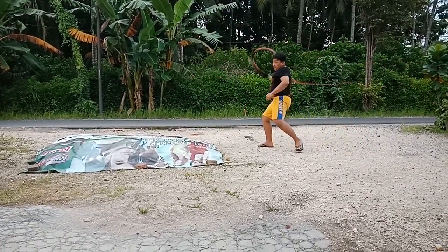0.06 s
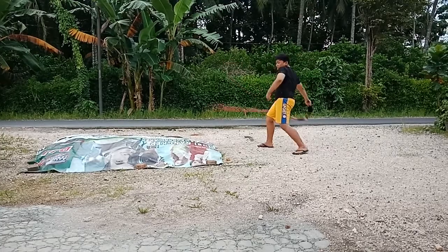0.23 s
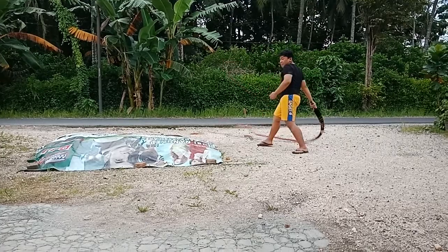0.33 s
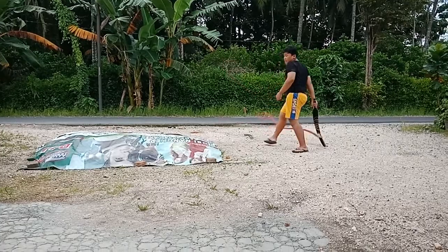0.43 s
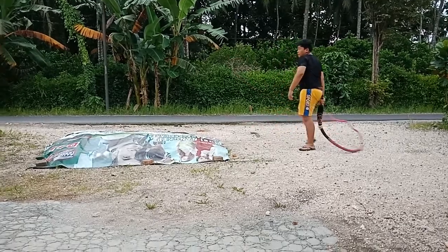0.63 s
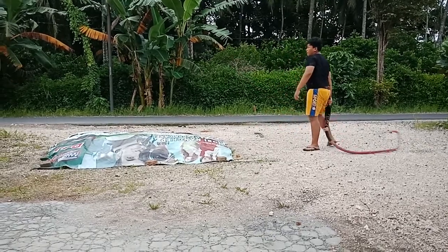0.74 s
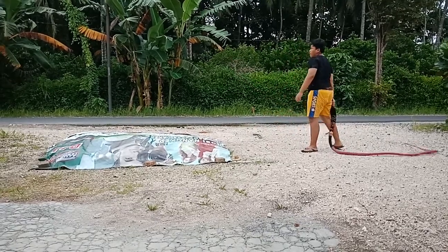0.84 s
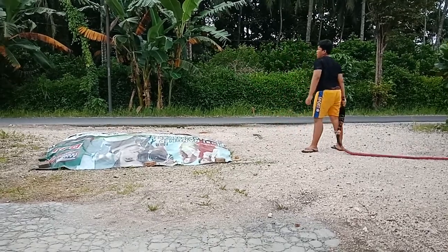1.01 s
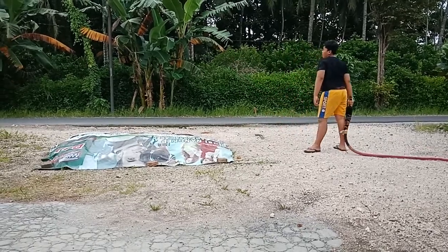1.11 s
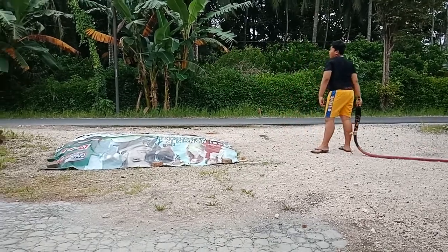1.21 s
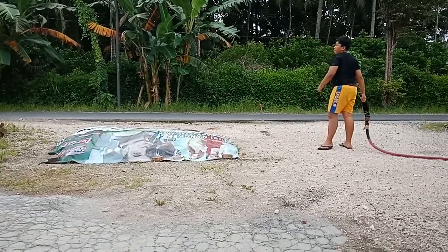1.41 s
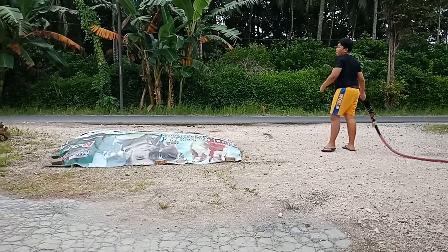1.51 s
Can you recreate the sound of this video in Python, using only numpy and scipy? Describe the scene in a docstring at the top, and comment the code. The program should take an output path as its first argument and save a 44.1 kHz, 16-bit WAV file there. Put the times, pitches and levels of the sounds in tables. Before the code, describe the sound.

Quiet roadside air with a gravel scuff and low distant motorbike, then one sharp, overloaded whip crack with a short thump and hissing echo tail; faint footsteps follow, on a stereo phone microphone that ducks and recovers.

```python
"""Sandals scuff gravel while a motorbike putters far off; then a long whip swishes and cracks, close by.
Footsteps, swish, echoes and air are shaped noise; the motorbike is a smeared train of firing pulses.
The crack is N-shaped shocks with noisy scatter, over a thump of damped sines; ground and trees
return it as a long hiss. A faint sine comes and goes afterwards.
The microphones saturate, and the phone's gain ducks and recovers."""
import sys
import numpy as np
from scipy import signal
from scipy.fft import rfft, irfft
from scipy.io import wavfile

SR = 44100
rng = np.random.default_rng(int(sys.argv[2]) if len(sys.argv) > 2 else 0)


def to_wav(s):
    """Save 16-bit WAV."""
    ch = np.atleast_2d(s).T  # columns
    pcm = np.round(np.clip(ch, -1, 1) * 32767)  # PCM
    wavfile.write(sys.argv[1], SR, pcm.astype(np.int16))


N = 68355  # length in samples, about 1.55 s

# Scuffs on gravel: start t/s, rise t/s, hold t/s, t60 t/s, level/dB, tilt/(dB per octave)
SCUFFS = [(0, 0.017, 0.0073, 0.59, -44, -1.5), (0.818, 0.0051, 0.023, 0.21, -43.5, -2),
          (1.242, 0.0088, 0.02, 0.38, -49, -4.5), (1.292, 0.02, 0.021, 0.3, -54, 0),
          (1.36, 0.012, .035, 0.2, -49.5, -2), (1.452, .02, 0.017, .4, -57, 3)]
# Spectrum of grinding stones, relative: f/Hz, level/dB
GRAVEL_SPECTRUM = [(300, -5.5), (800, 2.5), (1700, 8), (3500, 4.5), (4700, -3.5), (6500, -23), (8500, -39),
                   (15000, -45)]
# Left-right balance of swish, scuffs and echoes at the two microphones: f/Hz, left minus right level/dB
PORTS_PAN = [(100, 1.5), (700, -1), (1280, 0), (2350, -4), (4340, -10.5), (7000, -20), (15000, -21)]
# Spectrum of the distant exhaust, relative: f/Hz, level/dB
EXHAUST_SPECTRUM = [(25, -35), (55, -23), (80, -4), (112, 2), (150, -5), (190, -3.5), (270, -10),
                    (400, -11), (550, -14), (900, -26), (2000, -52)]
# Rise and fall of the motorbike around its base level: t/s, level/dB
BIKE_LEVEL = [(0, 4.5), (.15, 6), (.5, -1.5), (.85, -3), (1.1, -4), (1.22, 5.5), (1.35, -0.5), (1.55, 4.5)]
# Spectrum of the open-air background, relative: f/Hz, level/dB
AIR_SPECTRUM = [(25, -38), (50, -26.5), (75, 2.5), (130, -1.5), (250, -5.5), (400, -12), (650, -10.5),
                (1000, -14), (1800, -14.5), (4200, -21.5), (5500, -30), (8000, -45), (15000, -43)]
# Left-right balance of the background: f/Hz, left minus right level/dB
AIR_PAN = [(100, -1), (400, -9.5), (1280, 1.5), (2350, -3), (4340, -12.5), (8000, -4), (15000, 2.5)]
# Swish of the lash: start t/s, rise t/s, hold t/s, t60 t/s, level/dB
SWISH = (.177, .018, .006, .12, -37)
# The crack, its ground bounce, then a crackle: start t/s, level/dB, scatter t60 t/s, tilt/(dB per octave)
SHOCKS = [(.216, 9.5, 0.09, -1.06), (.23, 3.5, 0.08, 3.5), (0.2348, 4.5, 0.086, 1.5)]
# Spectrum of the crack, relative: f/Hz, level/dB
CRACK_SPECTRUM = [(60, -34.5), (120, -4.5), (250, -7.5), (750, -2), (1050, -4), (1500, 2.5), (2200, -0.5),
                  (2900, 0), (4000, -5.5), (6000, -20.5), (8000, -35), (15000, -60)]
# Left-right balance of the crack: f/Hz, left minus right level/dB
CRACK_PAN = [(200, -4), (380, -1), (690, 4), (1280, 5), (2350, -2), (4340, -5.5), (8000, -10), (15000, 1)]
# Low swings the blast knocks out of the microphones: f/Hz, level/dB before panning, t60 t/s
THUMP = [(95, -1, 0.1), (133.8, -9.5, .1), (205, -1, 0.065), (358, -9.5, 0.082)]
# Returns from the nearby ground and the trees: start t/s, rise t/s, hold t/s, t60 t/s, level/dB
ECHOES = [(0.222, 0.0059, 0.011, 0.38, -1.5), (0.318, 0.07, 0.078, 0.83, -20.5)]
# Spectrum of the returning hiss, also used for the swish, relative: f/Hz, level/dB
ECHO_SPECTRUM = [(70, -44.5), (170, -21), (380, -8), (630, -5.5), (1000, -2.5), (1700, 2), (2600, 1.5),
                 (3900, -8.5), (5700, -17), (6800, -31.5), (8200, -45.5), (15000, -55.5)]

GRIT_DB = 2.6  # mean random boost of each grain
FIRING_HZ, BIKE_JITTER = 37.5, .02  # mean firing rate; spread of the gaps as a fraction of one period
BIKE_DB, BIKE_SCATTER_DB, BIKE_PATHS_T60_S = -49.5, 3.5, 0.56
AIR_DB = -50
PORTS_ALIKE_HZ = 520  # well below this both microphones hear nearly the same
SHOCK_S, SHOCK_DB = .0005, -2.5  # length of the N-shaped wave; its height over the scatter
THUMP_PAN_DB, THUMP_LAG_S = -8.5, 0.0023  # left minus right; delay of the left
TREBLE_LOSS_DB_PER_S_KHZ, ECHO_MIDDLE_S = 2.5, 0.27
ECHO_GRAIN_DB, ECHO_GRAINS_PER_S = 1.1, 400
WHINE_HZ = 531
OVERLOAD_DB, LOW_CUT_HZ = 9.5, 62
CEILING_DB, RECOVER_DB_PER_S, LIMITER_ATTACK_S = -4.5, 30, .004
RUMBLE_HZ, RUMBLE_TRIP_DB, RUMBLE_CUT_DB = 170, -13, -8
RUMBLE_HOLD_S, RUMBLE_SLEW_S = 0.16, .06
CLIP_KNEE = 6  # higher is harder
TOP_HZ = 15400


def undb(db):
    """Turn decibels into an amplitude factor."""
    return 10 ** (np.asarray(db) / 20)


def curve(points):
    """Spread a (f/Hz, level/dB) table over every frequency bin, along log frequency."""
    hz, db = np.array(points, float).T
    bins_hz = np.fft.rfftfreq(N, 1 / SR)
    return np.interp(np.log(bins_hz + 1), np.log(hz), db)


def tilt(points, db_per_octave):
    """Lean a spectrum about 2 kHz."""
    return [(hz, db + db_per_octave * np.log2(hz / 2000)) for hz, db in points]


def colour(x, points):
    """Multiply a sound's spectrum by a curve and bring it to rms 1."""
    y = irfft(rfft(x) * undb(curve(points)), N)
    return y / y.std()


def ring(x, points):
    """Filter causally, with minimum phase and unit energy, so nothing sounds ahead of the hit."""
    cepstrum = irfft(curve(points) * np.log(10) / 20, N)
    # folding the cepstrum onto positive time gives minimum phase
    cepstrum[1:N // 2] *= 2
    cepstrum[N // 2:] = 0
    response = irfft(np.exp(rfft(cepstrum)), N)
    response = response / np.sqrt(np.sum(response ** 2))
    return signal.fftconvolve(x, response)[:N]


def place(x, pan):
    """Tilt a stereo pair left or right, frequency by frequency."""
    gains = undb(np.outer([.5, -.5], curve(pan)))
    return irfft(rfft(x) * gains, N)


def diffuse(points):
    """Noise from all around: nearly alike at both microphones in the bass, unrelated well above."""
    alike = .93 / (1 + (np.fft.rfftfreq(N, 1 / SR) / PORTS_ALIKE_HZ) ** 4)
    mid, side = rfft(rng.standard_normal((2, N)))
    shared = mid * np.sqrt(1 + alike)
    opposed = np.outer([1, -1], side * np.sqrt(1 - alike))
    return colour(irfft(shared + opposed, N), points)


def fade(age, t60):
    """Instant attack, then an exponential release of 60 dB per t60."""
    return (age >= 0) * np.exp(-np.log(1000) * np.maximum(age, 0) / t60)


def swell(t, start, rise, hold, t60, db):
    """Linear rise, hold and exponential release."""
    attack = np.clip((t - start) / rise, 0, 1)
    release = fade(np.maximum(t - start - rise - hold, 0), t60)
    return undb(db) * attack * release


def footsteps(t):
    """Sandals grind small stones: uneven noise grains, each scuff with its own brightness."""
    grains = rng.standard_normal((2, N)) * undb(GRIT_DB * rng.exponential(size=N))
    steps = 0
    for *shape, lean in SCUFFS:
        steps = steps + colour(grains, tilt(GRAVEL_SPECTRUM, lean)) * swell(t, *shape)
    return place(steps, PORTS_PAN)


def motorbike(t):
    """Slightly uneven firings of a distant single cylinder, smeared by many paths into a low note."""
    chance = rng.standard_normal((80, 2))
    at = (np.cumsum(1 + BIKE_JITTER * chance[:, 0]) - 1) * SR / FIRING_HZ
    inside = (at >= 0) & (at < N)
    pulses = np.zeros(N)
    pulses[at[inside].astype(int)] = undb(BIKE_SCATTER_DB * chance[inside, 1])
    # the paths smear phase only; the exhaust curve sets the colour
    paths = rfft(rng.standard_normal(N) * fade(t, BIKE_PATHS_T60_S))
    smeared = irfft(rfft(pulses) * paths / np.abs(paths), N)
    level_db = BIKE_DB + np.interp(t, *np.array(BIKE_LEVEL).T)
    return undb(level_db) * colour(smeared, EXHAUST_SPECTRUM)


def background_air():
    """A steady bed of diffuse noise from the open air."""
    return undb(AIR_DB) * place(diffuse(AIR_SPECTRUM), AIR_PAN)


def swish(t):
    """The lash tears the air: a short swell of diffuse noise that starts just before the crack."""
    return place(diffuse(ECHO_SPECTRUM), PORTS_PAN) * swell(t, *SWISH)


def crack(t):
    """N-shaped shocks, each with dense scatter behind it; the ground bounce and the later crackle are brighter."""
    snap = 0
    for start, db, t60, lean in SHOCKS:
        age = t - start
        n_wave = (age >= 0) * (age < SHOCK_S) * (1 - 2 * age / SHOCK_S)
        scatter = fade(age, t60) * rng.standard_normal((2, N))
        push = undb(db) * (undb(SHOCK_DB) * n_wave + scatter)
        spectrum = tilt(CRACK_SPECTRUM, lean)
        snap = snap + np.array([ring(side, spectrum) for side in push])
    return place(snap, CRACK_PAN)


def thump(t):
    """The blast jolts the microphones into low, quickly damped swings, the right one first and harder."""
    lag = np.array([[THUMP_LAG_S], [0]])
    age = t - SHOCKS[0][0] - lag
    swings = sum(undb(db) * np.sin(2 * np.pi * hz * age) * fade(age, t60) for hz, db, t60 in THUMP)
    return swings * undb(THUMP_PAN_DB * np.array([[.5], [-.5]]))


def echoes(t):
    """Countless stones and leaves return the crack as grainy hiss, duller as the paths get longer."""
    hz, when, bins = signal.stft(diffuse(ECHO_SPECTRUM), SR, nperseg=512)
    # the balance pivots at 2 kHz: brighter ahead of the middle time, duller after it
    loss_db = TREBLE_LOSS_DB_PER_S_KHZ * np.outer(hz / 1000 - 2, when - ECHO_MIDDLE_S)
    wash = signal.istft(bins * undb(-loss_db), SR)[1][:, :N]
    knots = np.arange(0, t[-1], 1 / ECHO_GRAINS_PER_S)
    grain = undb(ECHO_GRAIN_DB * np.interp(t, knots, rng.standard_normal(len(knots))))
    envelope = sum(swell(t, *row) for row in ECHOES)
    return place(wash * grain, PORTS_PAN) * envelope


def whine(t):
    """A faint sine of steady pitch comes and goes in the distance."""
    return np.sin(2 * np.pi * WHINE_HZ * t) * swell(t, start=.72, rise=.13, hold=.2, t60=.3, db=-54)


def limiter(x):
    """The gain drops within milliseconds of a loud sound and climbs back at a steady rate in dB."""
    k = 1 / (LIMITER_ATTACK_S * SR)
    power = signal.lfilter([k], [1, k - 1], np.mean(x ** 2, axis=0))
    over_db = np.maximum(10 * np.log10(power + 1e-12) - CEILING_DB, 0)
    climb_db = RECOVER_DB_PER_S * np.arange(N) / SR
    return x * undb(climb_db - np.maximum.accumulate(over_db + climb_db))


def rumble_suppressor(x):
    """A loud burst of bass turns the bass down for a moment."""
    bass = signal.sosfiltfilt(signal.butter(2, RUMBLE_HZ, fs=SR, output="sos"), x)
    index = np.arange(N)
    tripped = np.abs(bass).max(axis=0) > undb(RUMBLE_TRIP_DB)
    since = index - np.maximum.accumulate(np.where(tripped, index, -N))
    held = 1. * (since < RUMBLE_HOLD_S * SR)
    slew = np.hanning(int(RUMBLE_SLEW_S * SR) + 3)
    on = signal.fftconvolve(held, slew / slew.sum())[:N]
    return x + bass * (undb(RUMBLE_CUT_DB * on) - 1)


def scene():
    """Sum the air, the whip and its surroundings."""
    t = np.arange(N) / SR
    air = background_air()
    whip = crack(t) + thump(t) + echoes(t) + swish(t)
    roadside = footsteps(t) + motorbike(t) + whine(t)
    return air + whip + roadside


def record(dry):
    """The microphones saturate; the phone cuts deep bass, limits, holds down rumble, clips, cuts the top."""
    hot = undb(OVERLOAD_DB) * np.tanh(dry / undb(OVERLOAD_DB))
    hot = signal.sosfilt(signal.butter(2, LOW_CUT_HZ, "high", fs=SR, output="sos"), hot)
    out = rumble_suppressor(limiter(hot))
    out = out / (1 + np.abs(out) ** CLIP_KNEE) ** (1 / CLIP_KNEE)
    top_cut = signal.ellip(8, .2, 70, TOP_HZ, fs=SR, output="sos")
    return np.clip(signal.sosfilt(top_cut, out), -1, 1)


dry = scene()
out = record(dry)
to_wav(out)
```